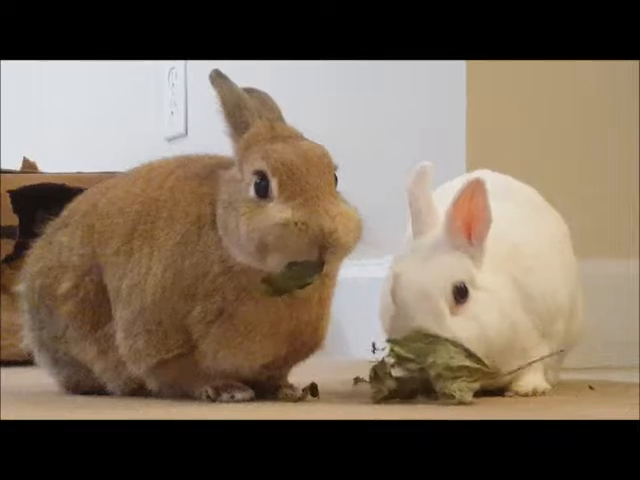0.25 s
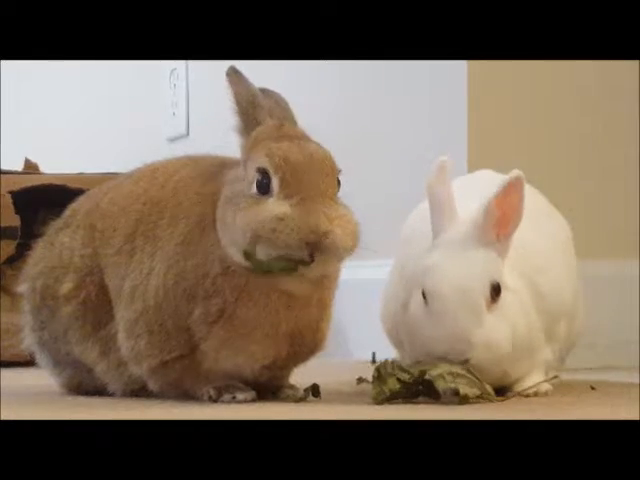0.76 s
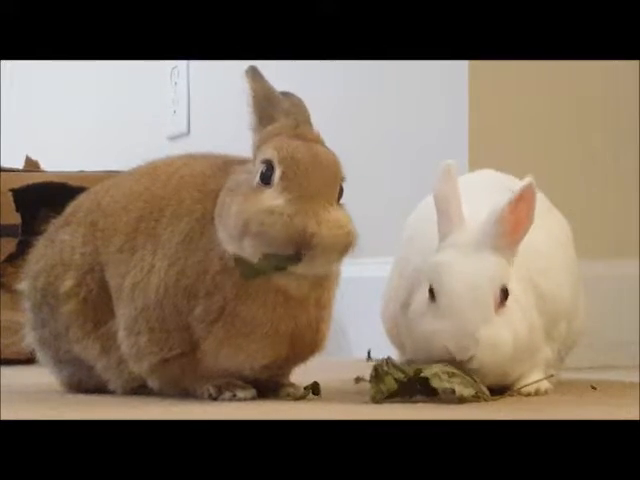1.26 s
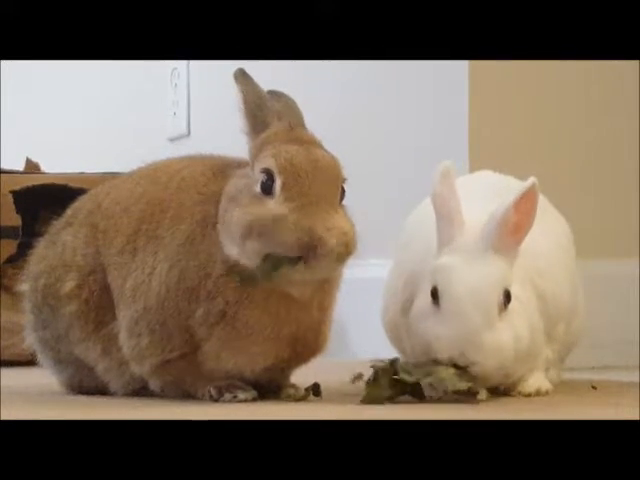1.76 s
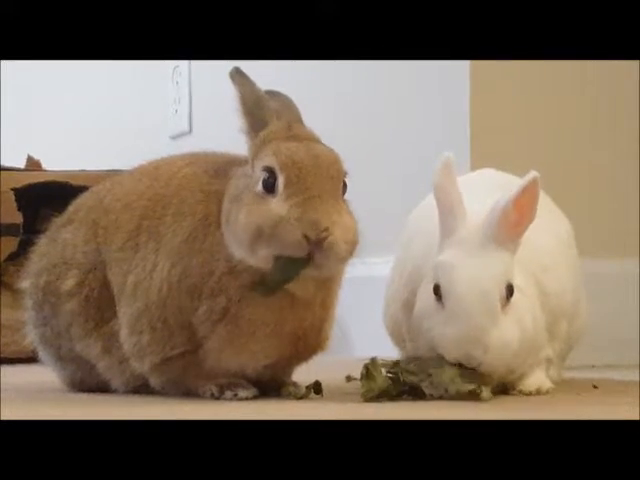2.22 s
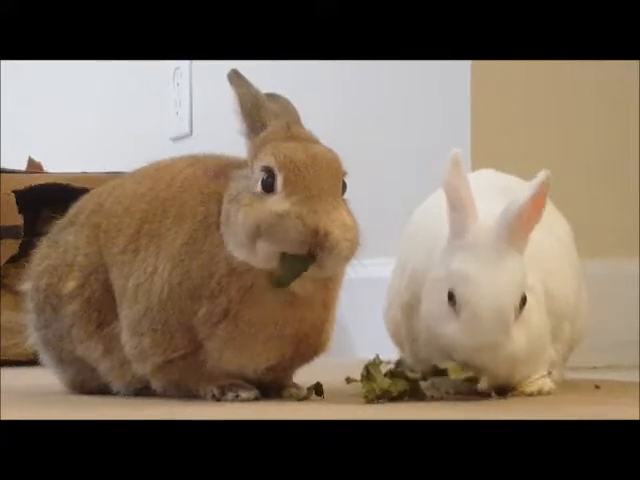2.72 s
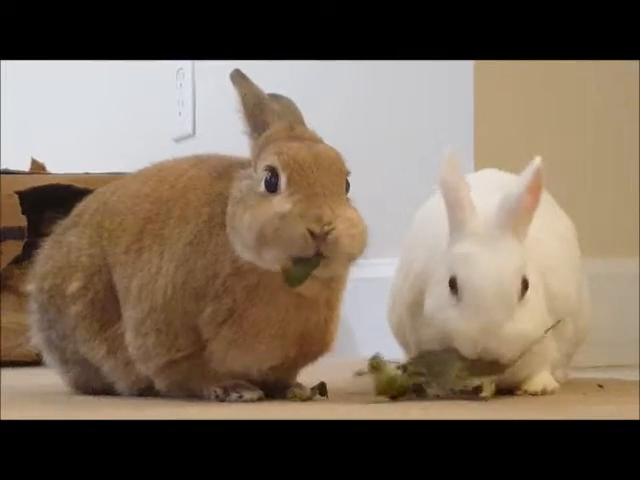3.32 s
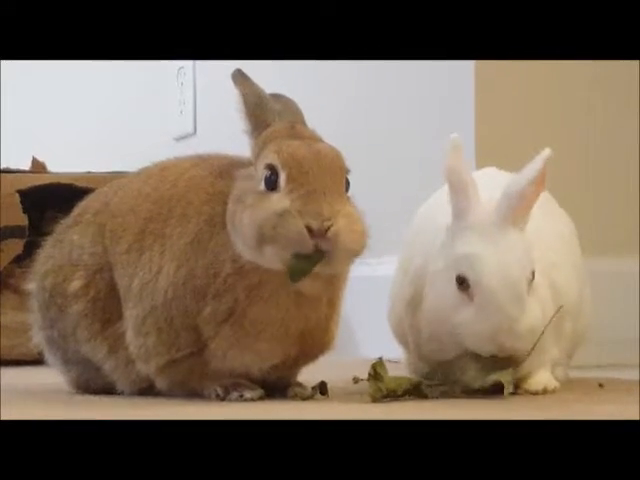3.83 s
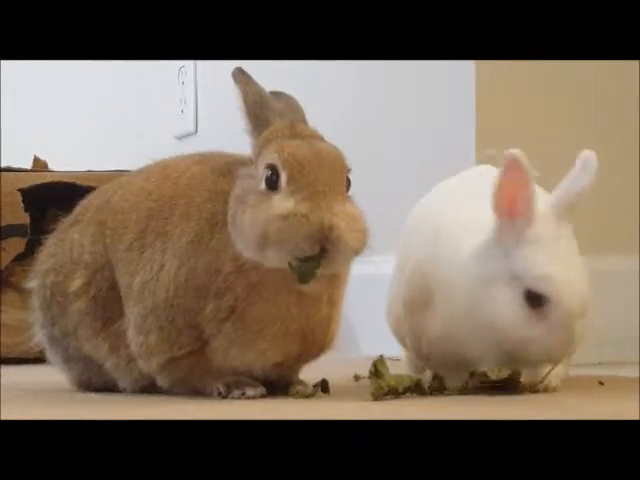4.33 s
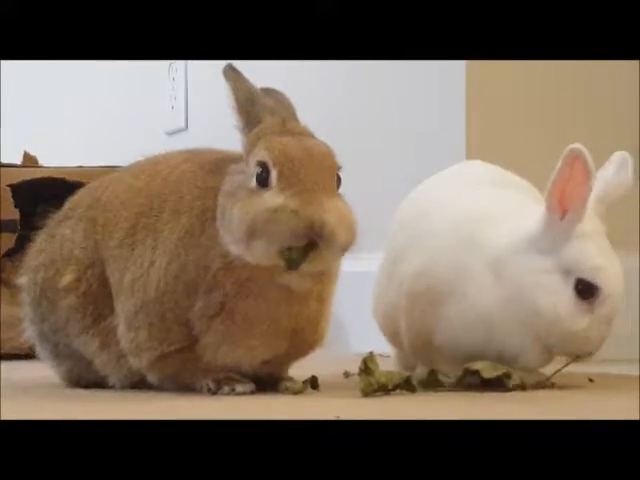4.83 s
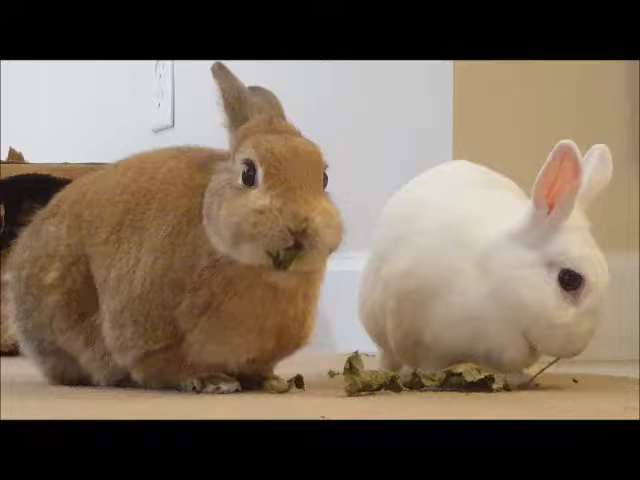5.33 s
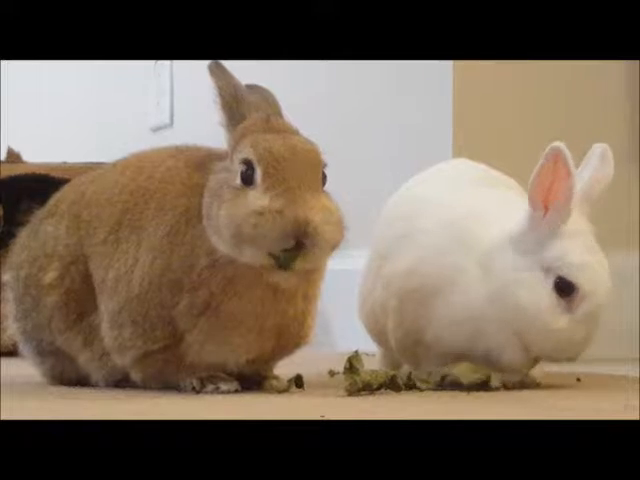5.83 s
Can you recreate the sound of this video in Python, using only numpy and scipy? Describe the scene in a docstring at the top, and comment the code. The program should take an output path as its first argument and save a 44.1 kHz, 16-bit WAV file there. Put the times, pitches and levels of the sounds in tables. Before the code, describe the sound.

Close to the microphone in a small room, two rabbits chew dry leaves. Short crisp bites come about four or five a second, each a cluster of tiny bright crackles and sharp snaps, with occasional woody knocks. Chewing gets denser and louder in the middle, then thins out. A steady low ventilation hum runs beneath, and a very faint high whine enters halfway.

```python
"""Two rabbits eating dry leaves

Two rabbits chew on the floor of a small room, close to a camera. Each bite crackles as clustered cell
bursts; veins crack as a step and a short noise, stalks knock as ringing modes, ribs tear as filtered clicks.
Ventilation is shaped noise with a wavering drone; halfway, a jittering sine adds a thin high whine."""
import sys
import numpy as np
from scipy import signal
from scipy.fft import rfft, irfft, next_fast_len
from scipy.io import wavfile

SR = 44100
rng = np.random.default_rng(int(sys.argv[2]) if len(sys.argv) > 2 else 0)


def wav_record(signal):
    """Record a signal, one row per channel, as 16-bit PCM in the file named by sys.argv[1]."""
    frames = np.transpose(np.atleast_2d(signal))
    bounded = np.clip(frames, -1, 1)
    # unit amplitude maps onto the largest positive 16-bit level
    quanta = np.round(bounded * 32767).astype(np.int16)
    wavfile.write(sys.argv[1], SR, quanta)


N = 267687
TIME = np.arange(N) / SR


def undb(db):
    """Decibels to gain."""
    return 10 ** (np.asarray(db) / 20)


def unit(x):
    """Scale to an energy of one."""
    return x / np.sqrt(np.sum(x ** 2) + 1e-18)


def gains(points, size):
    """Interpolate (Hz, dB) points over log frequency to gains on the bins of a transform."""
    hz, db = np.transpose(points)
    bins_hz = np.fft.rfftfreq(size, 1 / SR)
    return undb(np.interp(np.log(bins_hz + 1), np.log(hz), db))


def colour(x, points):
    """Filter by a spectrum, keeping the power of white noise."""
    g = gains(points, x.shape[-1])
    g = g / np.sqrt(np.mean(g ** 2))
    return irfft(rfft(x) * g, x.shape[-1])


def add(track, at_s, sound):
    """Mix a sound in at a time."""
    i = max(int(at_s * SR), 0)
    track[i:i + len(sound)] += sound[:max(len(track) - i, 0)]


def waver(cutoff_hz):
    """Low-passed noise with a standard deviation of one."""
    sos = signal.butter(2, cutoff_hz, fs=SR, output="sos")
    walk = signal.sosfilt(sos, rng.standard_normal(N))
    return walk / walk.std()


# Ventilation rumble running out into hiss. Each row: frequency in Hz, level in dB per Hz.
AIR_SPECTRUM = [(22, -102), (32, -101), (43, -81), (56, -73), (100, -71), (135, -76.5), (195, -73),
                (240, -86), (500, -86), (700, -93.5), (1000, -98), (1800, -103.5), (3050, -104.5),
                (3550, -110), (5200, -113), (15500, -114)]
# Room modes the ventilation drives. Each row: frequency in Hz, width in Hz, level in dB per Hz.
ROOM_MODES = [(91.4, 6.4, -69), (111.4, 29, -70.5), (169.8, 10, -67), (210.7, 11.8, -72.5),
              (252, 20, -83.5), (287.3, 25.5, -80), (367, 12.8, -78.5), (484.6, 14.4, -82), (529, 8.1, -85),
              (740.4, 7.1, -88), (842, 25, -91)]
# Unlikeness of two microphones in a diffuse field. Each row: frequency in Hz, side minus mid in dB.
STEREO_WIDTH = [(60, -31), (130, -21.5), (260, -11), (500, -5), (1000, 0), (12000, 0)]


def ventilation(pan_db=0.2):
    """Steady air noise swells in the room's modes; the bass is alike at both microphones."""
    size = next_fast_len(N)
    bins_hz = np.fft.rfftfreq(size, 1 / SR)
    power = gains(AIR_SPECTRUM, size) ** 2
    for hz, width_hz, db in ROOM_MODES:
        power += undb(db) ** 2 / (1 + ((bins_hz - hz) / width_hz) ** 2 * 2) ** 2
    spread = gains(STEREO_WIDTH, size)
    shape = np.sqrt(power * SR / 2 / (1 + spread ** 2))
    mid, side = rfft(rng.standard_normal((2, size))) * shape
    left, right = irfft([mid + spread * side, mid - spread * side], size)[:, :N]
    return np.array([undb(pan_db / 2) * left, undb(-pan_db / 2) * right])


def drone(hz=132, wander_rms_hz=5, wander_cutoff_hz=8, rms_db=-51.5, swell_rms=0.62, swell_cutoff_hz=12):
    """The strongest room mode: nearly a tone, wavering in pitch and level, alike at both microphones."""
    pitch_hz = hz + wander_rms_hz * waver(wander_cutoff_hz)
    tone = np.sin(2 * np.pi * np.cumsum(pitch_hz) / SR)
    swelling = tone * (1 + swell_rms * waver(swell_cutoff_hz))
    return undb(rms_db) * np.sqrt(N) * unit(swelling)


# Crisp top of a breaking leaf. Each row: frequency in Hz, relative level in dB.
LEAF_TOP = [(1000, -54), (3500, -43), (5000, -15.5), (6300, -9.5), (7800, 0), (9300, 3.5), (11500, 6),
            (14000, 10), (15600, 4), (16800, -5)]


def flap(hz, size, lift_db=5, width_hz=1800, fuller_db_per_octave=7):
    """Gains of a leaf whose freed flap rings at its pitch; a larger, lower flap radiates more low treble."""
    bins_hz = np.fft.rfftfreq(size, 1 / SR)
    fullness = gains([(5500, fuller_db_per_octave * np.log2(10500 / hz)), (10500, 0)], size)
    resonance = 1 + (undb(lift_db) - 1) / (1 + 1j * (bins_hz - hz) / width_hz)
    return gains(LEAF_TOP, size) * fullness * resonance


# Duller body of a breaking leaf. Each row: frequency in Hz, relative level in dB.
LEAF_LOW = [(400, -10), (1000, 6.5), (2000, 6), (3200, 3), (4600, -1), (6500, -5), (12000, -17)]


def cells(per_s, spread_db, lift_db=13, width_hz=1100, count=8, size=256):
    """Tiny cells burst at random, each at one of a few pitches; returns crisp top and body."""
    crisp, pops = 0, 0
    for hz in np.linspace(5500, 14000, count):
        hits = rng.random(N) < per_s / count / SR
        signs = rng.choice([-1, 1], N)
        strength = undb(spread_db * np.minimum(rng.exponential(size=N), 4))
        burst = hits * signs * strength
        ring = np.fft.fftshift(irfft(flap(hz, size, lift_db, width_hz)))
        crisp = crisp + signal.oaconvolve(burst, ring, "same")
        pops = pops + burst
    return crisp, colour(pops, LEAF_LOW)


# Crackle as the molars grind on. Each row: time in seconds, level in dB before trim_db.
GRIND_LEVEL = [(0, -85), (1.5, -87), (1.8, -68.5), (2.4, -70.5), (2.8, -73), (3.2, -68), (3.8, -77),
               (4.3, -77), (5.2, -73.5), (6.07, -93)]


def grinding(body_db=-5, trim_db=-5):
    """Faint sparse ticks from closed mouths."""
    crisp, body = cells(per_s=220, spread_db=-2.5)
    level_db = np.interp(TIME, *np.transpose(GRIND_LEVEL)) + trim_db
    return undb(level_db) * (crisp / crisp.std() + undb(body_db) * body / body.std())


# Bites that crumple the leaf, about five a second. Each row: hardest moment in seconds, length in seconds,
# crackle level in dB before trim_db, body relative to crackle in dB before body_trim_db.
LEAF_BITES = [(0.087, 0.032, -61.5, -11), (0.259, 0.027, -70, -24), (0.328, 0.12, -65.5, -11),
              (0.641, 0.13, -66, -29), (0.686, 0.013, -65, -9), (0.787, 0.076, -72, -4.5),
              (0.872, 0.02, -62, -13.5), (1.088, 0.064, -72, -4), (1.32, 0.13, -65.5, -12),
              (1.76, 0.14, -73.5, -8), (1.97, 0.054, -72, -6), (2.018, 0.18, -65.5, -8.5),
              (2.272, 0.092, -62, -8.5), (2.502, 0.11, -63, -12), (2.737, 0.12, -63, -15),
              (2.969, 0.09, -58.5, -16), (3.198, 0.057, -61.5, -11), (3.381, 0.079, -59.5, -11.5),
              (3.446, 0.053, -57, -15), (3.62, 0.17, -73.5, -4.5), (3.79, 0.049, -69, -8),
              (3.988, 0.065, -62, -16), (4.247, 0.094, -68, -15), (4.436, 0.016, -60.5, -21),
              (4.518, 0.045, -58.5, -17), (4.757, 0.0054, -56, -7), (4.798, 0.08, -56, -29),
              (5.073, 0.074, -62, -13), (5.29, 0.053, -70.5, -5), (5.519, 0.057, -71, -3.5),
              (6.018, 0.06, -68.5, -11)]
BITE_CLOSING = 0.44  # share of a bite in which the jaw closes; it relaxes for the rest


def bites(edge_db=-10, trim_db=-2.0, flake_db=-3, body_trim_db=2, catch_rms_db=4.5, catch_cutoff_hz=110):
    """Crackle grows as the jaw closes, then relaxes; the leaf catches and gives way, so it breaks in clusters."""
    out = np.zeros(N)
    fine = np.array(cells(per_s=1000, spread_db=0.0))
    flakes = np.array(cells(per_s=62, spread_db=0.0, lift_db=20.0, width_hz=610))
    catching = undb(catch_rms_db * waver(catch_cutoff_hz))
    crisp, body = (unit(fine) + undb(flake_db) * unit(flakes)) * catching
    for hardest_s, length_s, db, body_db in LEAF_BITES:
        start_s = max(hardest_s - BITE_CLOSING * length_s, 0)
        end_s = start_s + length_s
        span = slice(int(start_s * SR), int(end_s * SR))
        force_db = np.interp(TIME[span], [start_s, hardest_s, end_s], [edge_db, 0, edge_db])
        force = undb(force_db)
        crackle = unit(force * crisp[span])
        crackle = crackle + undb(body_db + body_trim_db) * unit(force * body[span])
        out[span] += undb(db + trim_db) * np.sqrt(len(force)) * crackle
    return out


# Loudest cracks, where a vein snaps. Each row: time in seconds, level in dB over 1.5 ms before trim_db,
# body relative to crisp top in dB, ring of the freed flap in Hz, decay of the tear in seconds.
VEIN_CRACKS = [(0.0815, -54, -18, 13000, 0.0002), (0.095, -51, -15, 10800, 0.0003),
               (0.2614, -49, -24, 9500, 0.00018), (0.2784, -53, -24, 12000, 0.00015),
               (0.3267, -50, -16, 11500, 0.00025), (0.331, -46.5, -22, 12600, 0.00013),
               (0.354, -47, -20.0, 12500, 0.00015), (0.3583, -49, -18, 13000, 0.0002),
               (0.3889, -54, -20, 11500, 0.00018), (0.6053, -55, -24, 11000, 0.00015),
               (0.63, -46, -28.0, 10800, 0.00028), (0.6878, -56, -16, 13000, 0.00025),
               (0.8698, -54, -17, 12000, 0.0003), (0.9026, -54, -22, 10000, 0.00013),
               (1.0405, -46, -16, 12400, 0.00015), (1.0681, -37, -16, 8200, 0.000057),
               (1.0698, -52, -15, 10500, 0.00013), (1.118, -49.5, -28.0, 8900, 0.00021),
               (1.2954, -54, -24.0, 14000, 9e-05), (1.3073, -38.5, -12.5, 9200, 0.00019),
               (1.311, -40.5, -6.5, 9300, 0.00036), (1.3201, -58, -11.0, 4500, 0.00018),
               (1.4861, -39.5, -4.5, 13800, 0.00017), (1.494, -49, -6, 7400, 0.00016),
               (1.7622, -49, -20, 11500, 0.00018), (1.812, -46, -2.0, 9600, 0.0001),
               (1.994, -50, -17, 14100, 0.00013), (2.0057, -53, -17, 11000, 0.00018),
               (2.0342, -38, -19, 14200, 0.00028), (2.036, -42, -6, 7000, 0.00023),
               (2.0401, -55, -13, 9600, 0.00046), (2.247, -48, -16, 9600, 0.00025),
               (2.2524, -40.5, -27, 13000, 0.0001), (2.2587, -52, -20, 12000, 0.0002),
               (2.2627, -52, -16, 12500, 0.0002), (2.2731, -35, -18, 9000, 0.00018),
               (2.2806, -40, -12, 14000, 0.00021), (2.3123, -38, -17, 13500, 0.00018),
               (2.3763, -46.5, -15.0, 12000, 0.00012), (2.5037, -48, -23.0, 8700, 0.00046),
               (2.5113, -33, -23, 10400, 0.00016), (2.546, -49, -22, 11000, 0.00015),
               (2.7194, -39, -22, 10100, 0.00022), (2.7321, -48, -20, 11000, 0.0002),
               (2.7532, -38, -20, 11400, 0.00013), (2.755, -39, -18.5, 9800, 0.00013),
               (2.944, -45.5, -28.0, 10100, 0.0002), (2.952, -49, -15, 9050, 0.00019),
               (2.9605, -51, -22, 10500, 0.00015), (2.969, -34, -10.5, 12200, 0.00022),
               (2.980, -35.5, -23, 13200, 0.00018), (2.985, -39, -19, 12800, 0.00028),
               (2.9899, -51, -19.0, 12000, 0.00019), (2.9989, -47, -14, 9300, 0.00018),
               (3.0049, -52, -18, 10000, 0.0002), (3.029, -46.5, -13, 9600, 0.00025),
               (3.0334, -43.5, -15, 9900, 0.00034), (3.0366, -46, -12, 11100, 0.00036),
               (3.195, -52, -28.0, 10100, 0.00031), (3.21, -43, -13, 9000, 0.00013),
               (3.216, -43, -21, 10400, 0.00033), (3.268, -44.5, -23, 9300, 0.00038),
               (3.3616, -52, -12, 12700, 8e-05), (3.364, -49, -16, 12100, 0.00021),
               (3.375, -48, -14, 12000, 0.00025), (3.3828, -51.5, -5, 10000, 0.0002),
               (3.423, -36.5, -23, 13600, 8e-05), (3.4354, -50.5, -10, 10800, 0.00043),
               (3.4379, -42, -8.5, 13000, 0.00039), (3.4474, -38.5, -24, 10600, 0.00022),
               (3.46, -40, -24, 11500, 0.0002), (3.4643, -46, -20, 13400, 0.00013),
               (3.4735, -34, -11, 9100, 0.00015), (3.5995, -51, -16, 10500, 0.00018),
               (3.6033, -52.5, -20, 11500, 0.00015), (3.6622, -53, -22, 11000, 0.00013),
               (3.7455, -37, -33, 10000, 0.000097), (3.9662, -50, -22, 10500, 0.00016),
               (3.969, -47, -22, 11000, 0.00016), (3.9787, -50, -22, 11000, 0.0002),
               (3.9962, -44, -31, 14000, 0.00019), (4.0100, -55, -22, 11000, 0.00015),
               (4.2599, -54, -18, 10000, 0.00018), (4.4921, -39.5, -16, 12200, 0.00011),
               (4.516, -46, -23.0, 10300, 0.00019), (4.524, -48, -18, 11300, 0.00033),
               (4.6673, -44, -24, 12800, 0.00012), (4.6715, -47, -28.0, 9900, 0.00013),
               (4.7868, -40, -22, 10500, 0.00017), (4.7984, -28, -15, 10500, 0.0001),
               (4.9944, -48, -19, 11500, 0.00016), (5.0453, -32.5, -19.5, 11900, 0.00011),
               (5.0538, -45, -23, 7900, 0.00015), (5.064, -47, -21.0, 8400, 0.00045),
               (5.07, -41, -20, 9200, 0.00025), (5.0729, -36.5, -16, 8400, 0.00024),
               (5.1083, -43, -26, 8300, 0.00018), (5.5174, -49, -19.0, 9600, 0.0001),
               (5.5303, -54, -22, 11000, 0.00013), (5.5522, -48, -16, 5700, 9e-05),
               (5.609, -47, -19, 13000, 0.00011), (5.7533, -62, -6, 10500, 0.00015),
               (5.9917, -45, -20, 8700, 0.00019)]


def cracks(ragged=1.0, trim_db=-4.5, top_db=-2.5, ring_db=5, ring_width_hz=1400, size=768):
    """A vein snaps in one step and tears on for a fraction of a millisecond; the freed flap rings."""
    out = np.zeros(N)
    t = (np.arange(size) - size // 2) / SR
    window = .0015 * SR  # samples
    duller = gains([(11000, 0.005), (15000, top_db)], size)  # veins are duller than cells
    noises = rng.standard_normal((len(VEIN_CRACKS), size))
    for (at_s, db, body_db, hz, tear_s), noise in zip(VEIN_CRACKS, noises):
        step = np.sign(noise[0]) * (t == 0)
        snap = step + ragged * noise * (t > 0) * np.exp(-np.abs(t) / tear_s)
        crisp = irfft(rfft(snap) * flap(hz, size, ring_db, ring_width_hz) * duller, size)
        sound = unit(crisp) + undb(body_db) * unit(colour(step, LEAF_LOW))
        add(out, at_s + t[0], undb(db + trim_db) * np.sqrt(window) * sound)
    return out


# Teeth meeting through a stalk. Each row: time in seconds, peak in dB, base pitch in Hz,
# decay of the crush in seconds, top of the blow in Hz.
STALK_KNOCKS = [(.871, -48, 1040, 0.0045, 2600), (1.0408, -44.5, 800, 0.0013, 1300),
                (1.0515, -49, 820, 0.0038, 1400), (1.0541, -50, 1190, .001, 1700),
                (1.310, -52, 1140, 0.0031, 2000), (1.4864, -28, 830, 0.0001, 11900),
                (2.264, -57, 1300, 0.0033, 2800), (2.9685, -59, 1210, 0.00041, 2500),
                (3.179, -55, 1100, .0038, 1500), (3.380, -48, 1100, 0.0087, 3600),
                (3.4735, -48, 1040, 0.00031, 2500), (4.757, -44.5, 1180, 0.001, 1710),
                (4.768, -53, 1400, .003, 1800), (5.976, -52, 1310, 0.0021, 1570)]
# Modes of jaw and stalk. Each row: multiple of the base pitch, relative level in dB, T60 in seconds.
JAW_MODES = [(.66, -8, 0.018), (.97, 4, 0.0036), (1.25, 16.5, 0.0067), (1.55, 10.5, 0.0037),
             (2, 5.5, 0.0042), (2.45, -1, 0.0072), (2.9, 3, 0.008), (3.7, -6, 0.0083), (6.1, -4, 0.006),
             (8.8, 6, 0.0074), (9.35, 7, 0.008)]


def knocks(crush=0.097, size=2048):
    """Teeth crush a stalk and meet; the jaw rings low and short, and a soft blow leaves its high modes still."""
    out, t = np.zeros(N), np.arange(size) / SR
    noises = rng.standard_normal((len(STALK_KNOCKS), size))
    for (at_s, peak_db, hz, crush_s, top_hz), noise in zip(STALK_KNOCKS, noises):
        ring = np.zeros(size)
        for ratio, mode_db, t60_s in JAW_MODES:
            ring += undb(mode_db - 60 * t / t60_s) * np.sin(2 * np.pi * hz * ratio * t)
        blow = (t == 0) + crush * noise * np.exp(-t / crush_s)
        push = signal.lfilter(*signal.butter(2, top_hz, fs=SR), blow)
        sound = signal.fftconvolve(ring, push)[:size]
        sound = signal.lfilter(*signal.butter(2, 450, "high", fs=SR), sound)  # a small head radiates no bass
        add(out, at_s, undb(peak_db) * sound / np.abs(sound).max())
    return out


# A thick rib tears. Each row: time in seconds, decay in seconds, level in dB, pitch of the rib in Hz.
RIB_TEARS = [(1.0683, 0.0005, -47, 5740), (1.309, 0.013, -66, 4800), (2.275, 0.0049, -60, 5140),
             (2.754, 0.0011, -51, 5000), (2.969, 0.0005, -51, 4650), (4.7979, 0.00046, -39, 4400),
             (5.0642, 0.002, -47, 8000), (5.0688, 0.0096, -53, 5860), (5.55, 0.011, -63, 5500)]


def tears(fibres_per_s=4000, width_hz=2200, size=4096):
    """A run of breaking fibres rings a thick rib, lower than the leaf's crackle, and dies away."""
    out, t = np.zeros(N), np.arange(size) / SR
    for at_s, decay_s, db, hz in RIB_TEARS:
        breaks = rng.random(size) < fibres_per_s / SR
        fibres = breaks * rng.standard_normal(size) * np.exp(-t / decay_s)
        band_hz = [hz - width_hz / 2, hz + width_hz / 2]
        rib = signal.lfilter(*signal.butter(2, band_hz, "band", fs=SR), fibres)
        add(out, at_s, undb(db) * np.sqrt(decay_s * SR / 2) * unit(rib))
    return out


# Whine sinking in pitch, in small steps and dips. Each row: time in seconds, centre pitch in Hz.
WHINE_PITCH = [(2.95, 12300), (3.15, 12170), (3.25, 11870), (3.55, 11830), (3.66, 12000), (4.38, 11940),
               (4.44, 11660), (4.55, 11820), (4.85, 11840), (4.93, 11680), (5.0, 11830), (5.27, 11760),
               (5.33, 11580), (5.48, 11560), (5.6, 11760), (5.82, 11740), (5.9, 11520), (6.0, 11760)]


def whine(rms_db=-75.5, jitter_rms_hz=135, jitter_cutoff_hz=220, hiss_rms_db=-79, onset_s=.02,
          wander_rms_hz=20, wander_cutoff_hz=6):
    """A thin tone that wanders and jitters in pitch, with a little hiss; perhaps the camera's lens motor."""
    s, hz = np.transpose(WHINE_PITCH)
    jitter = signal.lfilter(*signal.butter(1, jitter_cutoff_hz, fs=SR), rng.standard_normal((2, N)))
    pitch_hz = np.interp(TIME, s, hz) + wander_rms_hz * waver(wander_cutoff_hz)
    pitch_hz = pitch_hz + jitter_rms_hz * jitter / jitter.std()
    tone = np.sqrt(2) * np.sin(2 * np.pi * np.cumsum(pitch_hz, axis=1) / SR)
    hiss = colour(rng.standard_normal((2, N)), LEAF_TOP)
    onset = np.clip((TIME - s[0]) / onset_s, 0, 1)
    return (undb(rms_db) * tone + undb(hiss_rms_db) * hiss) * onset


# What the walls send back. Each row: frequency in Hz, relative level in dB.
WALL_SPECTRUM = [(300, -11), (1000, 0), (3000, 13), (6000, 8.5), (10000, 8), (16000, -6)]
# Scatter from things close by and the tail of the walls, against the direct sound.
EARLY_DB, EARLY_S, TAIL_DB, TAIL_T60_S = -18, .004, -10.5, .13


def room(x, pan_db=2, lag_samples=1.0, bounce_db=-16, bounce_s=.0016,
         echo_db=-14, echo_s=0.0053, echo_pan_db=9, echo_lag_samples=20, size=16384):
    """Direct sound (left first), scattered floor bounce, one clear echo from a left wall and a short tail."""
    n = np.arange(size)
    t = n / SR
    lead = 8  # samples of room for the sinc's onset
    out = []
    for ear, side in enumerate((1, -1)):  # left, right
        bounce, early, tail = rng.standard_normal((3, size)) * (1 - np.exp(-t / 0.0012))
        floor = bounce * np.exp(-np.abs(t - bounce_s) / 0.0013)
        scatter = early * np.exp(-t / EARLY_S)
        walls = colour(tail, WALL_SPECTRUM) * undb(-60 * t / TAIL_T60_S)
        direct = np.sinc(n - lead - ear * lag_samples)
        echo = np.sinc(n - lead - echo_s * SR - ear * echo_lag_samples)
        response = direct + undb(echo_db + side * echo_pan_db / 2) * echo
        response += undb(bounce_db) * unit(floor) + undb(EARLY_DB) * unit(scatter) + undb(TAIL_DB) * unit(walls)
        heard = signal.fftconvolve(x, response)[lead:N + lead]
        out.append(undb(side * pan_db / 2) * heard)
    return np.array(out)


def scene():
    """The chewing in the room, over ventilation, drone and whine."""
    background = ventilation() + drone()
    chewing = grinding() + bites() + cracks() + knocks() + tears()
    return background + room(chewing) + whine()


def record(dry, top_hz=15750):
    """The camera cuts the top with a steep low-pass."""
    return signal.sosfilt(signal.ellip(8, .2, 70, top_hz, fs=SR, output="sos"), dry)


dry = scene()
out = record(dry)
wav_record(out)
```